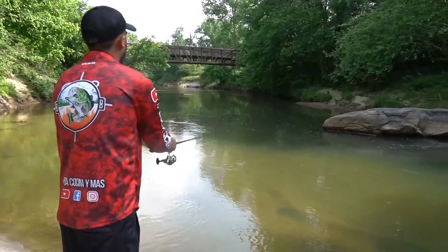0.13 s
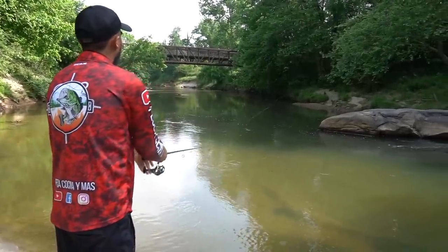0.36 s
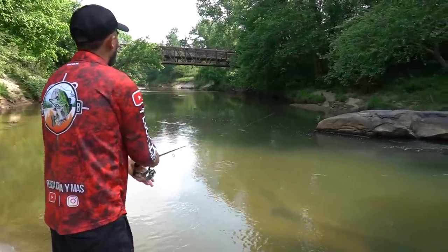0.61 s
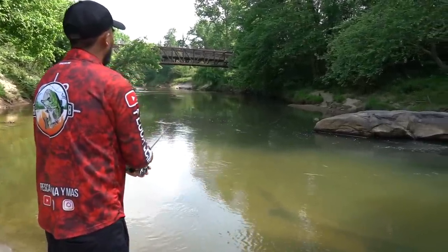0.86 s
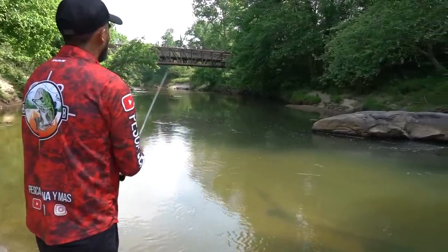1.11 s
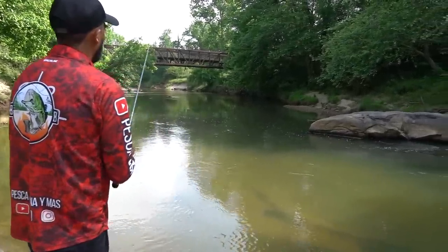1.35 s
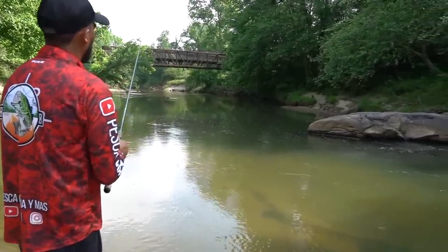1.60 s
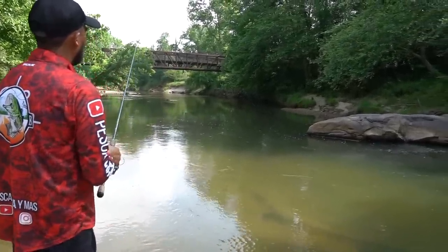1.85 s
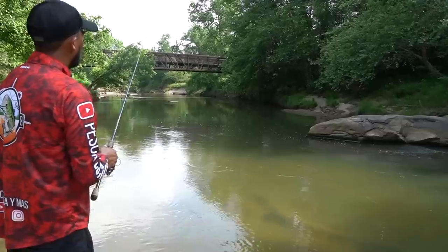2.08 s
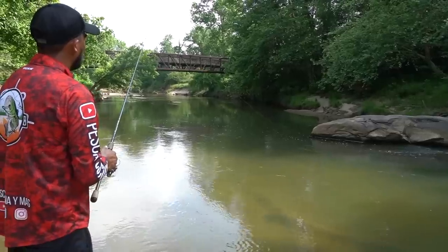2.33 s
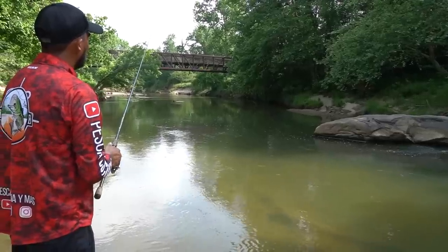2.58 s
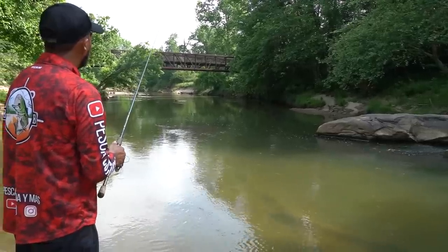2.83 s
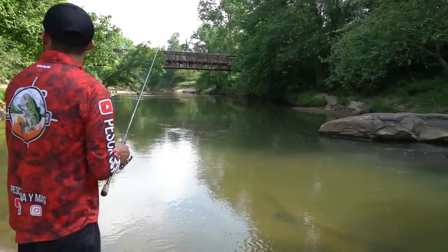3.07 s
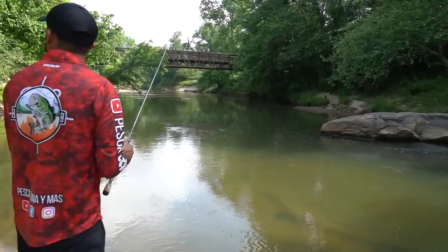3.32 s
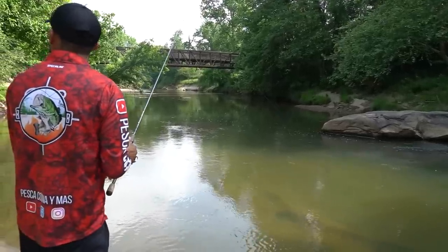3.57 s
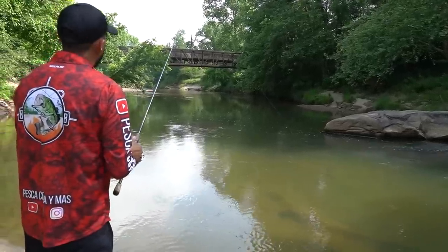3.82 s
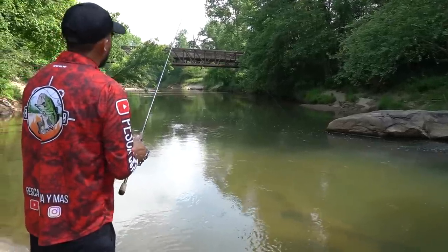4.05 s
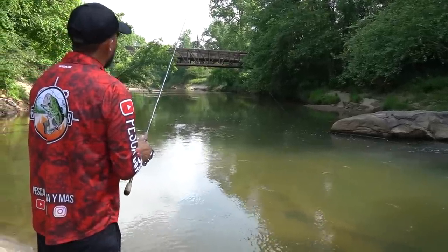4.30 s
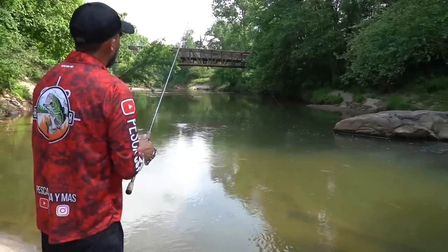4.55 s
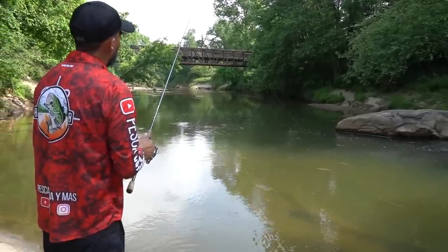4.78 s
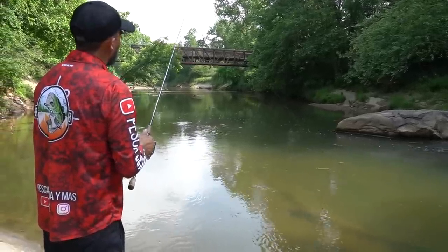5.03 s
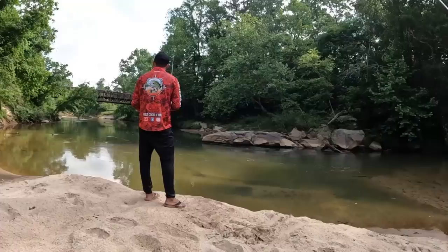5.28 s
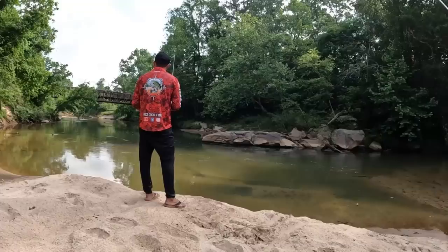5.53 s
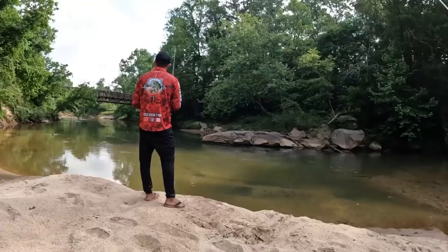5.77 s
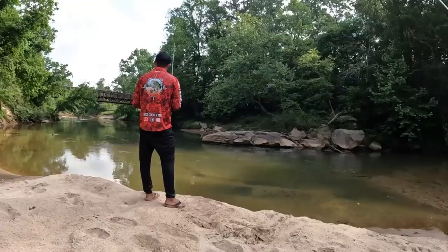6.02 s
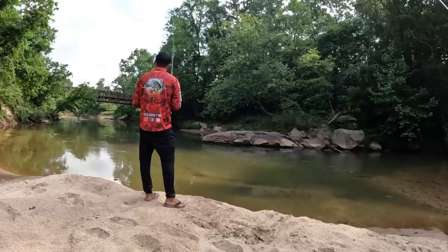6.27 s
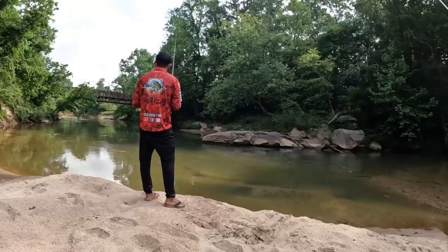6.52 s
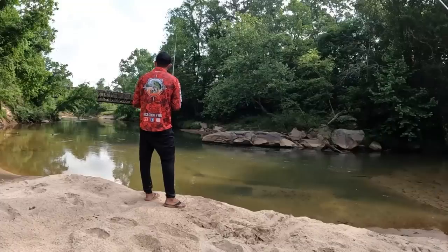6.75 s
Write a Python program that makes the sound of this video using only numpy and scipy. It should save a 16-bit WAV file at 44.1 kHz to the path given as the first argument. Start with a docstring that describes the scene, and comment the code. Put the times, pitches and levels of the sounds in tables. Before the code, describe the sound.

Wooded river bank, close body-worn microphone. Quick birds whistle with echoes from the trees over a soft low rumble. Shirt cloth rustles and a reel bail snaps sharply at about one second, followed by ticks, faint crackles and watery drips. Thin nasal bird squeals come later. Just after five seconds it cuts to a farther microphone: quieter, duller, wider, with sparse drips, light lapping and a puff of leaves.

```python
"""A wooded river bank: songbirds whistle (gliding sines), squeal (overtones under a bill resonance) and buzz,
and the trees echo them (decaying noise tails) over a low distant rumble of coloured noise.
Close to a body-worn microphone an angler's shirt rustles (modulated noise), a reel snaps and ticks (struck
modes, band-passed blows), stray snaps crackle, and water drips and gurgles (ringing bubbles).
At the cut a second, wider microphone further up the bank takes over: quieter, duller, with leaves and lapping."""
import sys
import numpy as np
from scipy import signal
from scipy.fft import rfft, irfft
from scipy.io import wavfile
from scipy.ndimage import uniform_filter1d

SR = 44100
rng = np.random.default_rng(int(sys.argv[2]) if len(sys.argv) > 2 else 0)


def wav_record(signal):
    """Record a signal, one row per channel, as 16-bit PCM in the file named by sys.argv[1]."""
    frames = np.transpose(np.atleast_2d(signal))
    bounded = np.clip(frames, -1, 1)
    # unit amplitude maps onto the largest positive 16-bit level
    quanta = np.round(bounded * 32767).astype(np.int16)
    wavfile.write(sys.argv[1], SR, quanta)


def voltage_ratio(level):
    """Linear amplitude factor for a level in decibels (scalar or array-like)."""
    return 10 ** (np.asarray(level, float) / 20)


N = 303408
TIME = np.arange(N) / SR
CUT_S = 5.165  # the far microphone takes over


def colour(points):
    """Spectral shaping: white noise weighted by a (Hz, dB) curve on a log frequency axis, scaled to rms 1."""
    hz, db = np.transpose(points)
    f = np.maximum(np.fft.rfftfreq(N, 1 / SR), 1)
    gain = voltage_ratio(np.interp(np.log(f), np.log(hz), db, -90, -90))
    x = irfft(rfft(rng.standard_normal(N)) * gain, N)
    return x / x.std()


def band(x, lo_hz, hi_hz, order=2):
    """Band limitation: a Butterworth band-pass."""
    sos = signal.butter(order, [lo_hz, min(hi_hz, SR / 2.2)], "band", fs=SR, output="sos")
    return signal.sosfilt(sos, x)


def curve(table):
    """Linear interpolation: the columns after the time column, sample by sample."""
    s, *columns = np.transpose(table)
    return [np.interp(TIME, s, c) for c in columns]


def walk(rate):
    """Slow random modulation: held random levels, smoothed, with spread 1; rate in steps per second."""
    k = int(SR / rate)
    x = uniform_filter1d(np.repeat(rng.standard_normal(N // k + 1), k), k)[:N]
    return x / x.std()


def add(out, s, x):
    """Superposition: a sound is summed in at its start in seconds."""
    i = max(int(s * SR), 0)
    out[i:i + len(x)] += x[:N - i]


def whistles():
    """Frequency modulation: soft-ended gliding sines, shaken by burr; returns direct sound and echo feed."""
    # Near-sine notes. Each row: start in seconds, length in seconds, first and last frequency in Hz,
    # level in dB, gain of the direct sound alone in dB.
    clear_notes = [(0.0, 0.026, 3050, 3030, -46, 3), (0.121, 0.044, 3045, 2990, -40.5, 2),
                   (0.191, 0.019, 2260, 2780, -42.5, 0), (0.212, 0.037, 2775, 2370, -48, 10.5),
                   (0.419, .012, 3280, 3920, -42, 2), (.435, 0.027, 3420, 2660, -38.5, 0),
                   (0.489, 0.057, 2943, 3600, -40.5, 2.5), (0.539, .09, 3580, 3344, -40, -6),
                   (0.674, .056, 2413, 2487, -42.5, 9), (0.751, 0.027, 2905, 3000, -35, 0.5),
                   (0.802, 0.16, 2980, 2900, -48, -5), (1.065, 0.087, 3320, 3030, -42.5, 9),
                   (1.133, 0.0915, 3190, 2976, -43.5, 6), (1.213, 0.061, 3060, 3010, -49, -9),
                   (1.283, 0.042, 2787, 2370, -41, 3), (1.304, 0.046, 2406, 2470, -37, -5),
                   (1.36, 0.042, 2524, 2717, -42, 4), (1.4, 0.046, 2700, 2420, -47.5, 11),
                   (1.724, 0.052, 3050, 2270, -42.5, 7), (1.902, 0.066, 3006, 3080, -38.5, 3),
                   (1.939, 0.046, 3037, 3330, -39, 3), (2.29, 0.067, 2370, 3090, -47.5, 7),
                   (2.879, 0.16, 6630, 5970, -60, 0), (3.086, 0.14, 5720, 4130, -49, -5),
                   (3.425, 0.011, 3880, 3720, -44.5, 1.5), (3.712, 0.049, 3990, 4000, -49, 1),
                   (3.947, 0.065, 4120, 4060, -47, 0), (4.039, 0.051, 4050, 3250, -51.5, 12),
                   (4.193, 0.085, 3370, 2820, -55, 3), (4.3, 0.064, 2740, 2320, -60, 10.5),
                   (4.85, 0.16, 4110, 3770, -60, 5), (5.744, 0.079, 3070, 2785, -65, 2),
                   (6.3, 0.092, 2795, 2830, -62.5, -1), (6.0702, 0.0096, 5870, 7900, -37.5, -0.5),
                   (6.137, .018, 6460, 8220, -44.5, -12)]
    # Buzzy notes of a farther bird. Each row: start in seconds, length in seconds, first and last
    # frequency in Hz, level in dB.
    buzzy_notes = [(2.236, 0.027, 3115, 2950, -38.5), (3.202, 0.13, 4490, 3795, -49),
                   (3.502, 0.0493, 3920, 3740, -47), (3.596, 0.093, 3370, 3060, -53.5),
                   (3.76, 0.091, 4800, 4120, -49), (4.052, 0.051, 4570, 4110, -49),
                   (4.25, .14, 3490, 3850, -58), (6.073, 0.12, 3245, 2920, -64),
                   (6.681, 0.12, 3250, 2990, -64)]
    burr_at_3_khz, burr_power = .02, .6  # pitch shake as a share of the pitch, growing with pitch
    buzz_burr, buzz_direct_db = .07, 3
    octave_db = -25  # faint octave overtone
    direct, sung, shake = np.zeros(N), np.zeros(N), walk(400.)
    notes = [(*row, burr_at_3_khz * (row[2] / 3000) ** burr_power) for row in clear_notes]
    notes += [(*row, buzz_direct_db, buzz_burr) for row in buzzy_notes]
    for s, length, hz0, hz1, db, direct_db, burr in notes:
        u = np.linspace(0, 1, int(length * SR))
        glide = hz0 * (hz1 / hz0) ** u
        hz = glide * (1 + burr * shake[int(s * SR):][:len(u)])
        phase = 2 * np.pi * np.cumsum(hz) / SR
        tone = np.sin(phase) + voltage_ratio(octave_db) * np.sin(2 * phase)
        note = voltage_ratio(db) * np.sin(np.pi * u) ** .5 * tone
        add(sung, s, note)
        add(direct, s, voltage_ratio(direct_db) * note)
    return direct, sung


def squeals():
    """Source and filter: the open bill favours the overtones near its resonance; each flickers a little."""
    # Nasal squeals, one list per note. Each row: time in seconds, pitch in Hz, level in dB,
    # bill resonance in Hz.
    squeal_notes = [
        [(2.71, 1500, -56, 5970), (2.76, 1353, -58, 5400), (2.854, 1304, -60, 5500), (2.9, 1240, -56, 6200)],
        [(3.34, 1588, -47, 6300), (3.374, 1376, -54, 6760), (3.41, 1330, -53, 6400), (3.5, 1335, -55, 6400),
         (3.6, 1242, -51, 6900), (3.63, 1190, -60, 5800)],
        [(3.92, 1456, -51, 8100), (3.964, 1416, -56, 8600), (4.0, 1242, -49, 7740), (4.106, 1173, -53.5, 7000),
         (4.14, 1190, -64, 6600)],
        [(4.27, 1016, -55, 6000), (4.328, 1170, -50, 6900), (4.37, 1254, -47.5, 6500)],
        [(4.49, 1104, -51, 5640), (4.54, 1148, -55.5, 6150), (4.575, 1220, -56, 7050)],
        [(4.795, 1410, -53, 7300), (4.9, 1282, -52, 7200), (4.958, 1140, -53, 6200), (4.975, 1125, -60, 6000)],
    ]
    bill_width_hz, flicker_db = 1500, 1
    out, wobble = np.zeros(N), walk(300.)
    flicker = {k: voltage_ratio(flicker_db * walk(40.)) for k in (4, 5, 6)}  # multiples of the pitch
    for note in squeal_notes:
        s, *columns = np.transpose(note)
        t = np.arange(s[0], s[-1], 1 / SR)
        at = (t * SR).astype(int)
        hz, db, bill_hz = (np.interp(t, s, c) for c in columns)
        phase = 2 * np.pi * np.cumsum(hz * (1 + 0.01 * wobble[at])) / SR
        tone = np.zeros(len(t))
        for k, gain in flicker.items():
            resonance = np.exp(-((k * hz - bill_hz) / bill_width_hz) ** 2)
            tone += gain[at] * resonance * np.sin(k * phase)
        add(out, s[0], np.sqrt(2) * voltage_ratio(db) * tone * signal.windows.tukey(len(t), .1))
    return out


def trees(x, t60, wet_db, gap_s):
    """Diffuse reverberation: trunks and banks scatter echoes that build up and decay, one set for each side."""
    t = np.arange(int(1.5 * SR)) / SR
    decay = np.exp(-np.log(1000) * t / t60)
    tail = rng.standard_normal((2, len(t))) * decay * (1 - np.exp(-t / gap_s))
    tail *= voltage_ratio(wet_db) / np.sqrt((tail ** 2).sum(1, keepdims=True))
    return signal.fftconvolve(x[None], tail, axes=1)[:, :N]


def reel():
    """Modal vibration: the bail snaps shut and rings in its modes; small parts tick broad and short."""
    # Blows and bounces of the bail. Each row: start in seconds, level in dB.
    snap_blows = [(1.029, -29.5), (1.0453, -3.5), (1.0493, -16.5), (1.0575, -24), (1.065, -21)]
    # Modes of the bail. Each row: frequency in Hz, relative level in dB, 60 dB decay time in seconds.
    bail_modes = [(2830, -24.5, 0.0062), (4800, -4.5, 0.013), (5500, 1.5, 0.0029), (7460, -5.5, 0.0078),
                  (9000, -23, 0.0033), (10620, -2.5, 0.0068), (15430, -14, .006)]
    # Reel and line ticks. Each row: start in seconds, level in dB, brightness in dB (fizz up, knock down).
    tick_blows = [(.0148, -18, 8), (0.2285, -20, 14), (.389, -33, 11), (0.5316, -17.5, -1),
                  (0.659, -21, -2), (.6724, -17.5, 9), (.7262, -21, -8), (.794, -17.5, 7), (1.008, -14, -4),
                  (1.1014, -28, 2), (1.1128, -10, 3), (1.122, -16, 6), (1.1293, -17.5, 6), (1.202, -16, 5),
                  (1.334, -21, -10), (1.571, -22, 6), (1.6276, -22, 8), (1.9728, -19, 13),
                  (2.0024, -17, 11), (2.0821, -16.5, -7), (2.268, -27, -4), (2.4155, -23, 5),
                  (2.5243, -20.5, 11), (2.656, -24, 11), (2.682, -22, 8), (2.9043, -24, -2),
                  (3.305, -21, 9), (3.322, -19, 9), (3.71, -21.5, 15.5), (3.741, -24, 8), (3.8865, -17, 8),
                  (3.9112, -22, 10), (3.931, -18, 9), (4.3595, -32, 4), (4.3988, -21, 8), (4.4518, -32, 20),
                  (4.528, -25, 14), (4.571, -17.5, 17), (4.791, -26, 10), (5.2185, -34, 0.5),
                  (5.34, -40.5, -3), (5.467, -35, 12), (5.5527, -38.5, 3)]
    knock_db, fizz_db = 8, -16.5  # at brightness 0
    knock_per_db = .85  # knock lost per dB of brightness
    out, t = np.zeros(N), np.arange(SR // 20) / SR
    ring = np.zeros(len(t))
    for hz, db, t60 in bail_modes:
        ring += voltage_ratio(db) * np.exp(-np.log(1000) * t / t60) * np.sin(2 * np.pi * hz * t)
    crack = rng.standard_normal(len(t)) * np.exp(-t / 0.00071)  # the crack of contact
    ring += voltage_ratio(-1.5) * band(crack, 2100.0, 14000.0)
    for s, db in snap_blows:
        add(out, s, voltage_ratio(db) * ring * (1 - np.exp(-t / .0003)))
    for s, db, bright_db in tick_blows:
        chatter = rng.standard_normal(len(t)) * np.exp(-t / .002)
        blow = (t == 0) + 0.16 * chatter  # one contact and a short chatter
        knock = voltage_ratio(knock_db - knock_per_db * bright_db) * band(blow, 1200.0, 4500.0)
        middle = band(blow, 3200.0, 6900.0)
        fizz = voltage_ratio(fizz_db + bright_db) * band(blow, 7400.0, 15000.)
        add(out, s, voltage_ratio(db) * (knock - middle + fizz))
    return out


def rustle():
    """Stick-slip friction: fine hiss that follows the stirring, and short bursts of unevenly grained noise."""
    # How much shirt and arms stir. Each row: time in seconds, level over rest in dB before weighting by band.
    stirring = [(0, 3.5), (.6, 1), (.8, 8), (.95, 17.5), (1.12, 13.5), (1.25, 14.5), (1.4, 7.5),
                (1.55, 1.5), (1.7, 8.5), (1.9, 8.5), (2.15, 10.5), (2.4, 3.5), (3, 0.5), (3.8, 2.5),
                (4.6, -0.5), (5.17, -3.5)]
    # Spectra of the rustle. Each row: frequency in Hz, relative density in dB per Hz.
    treble_spectrum = [(1180, -27), (2000, -16.5), (3180, -2), (3790, -5), (5100, -10.5), (6330, -5.5),
                       (10000, -9.5), (13000, -47), (22000, -120)]
    top_spectrum = [(7000, -28.5), (10000, -5), (15300, -7.5), (15900, -25.5)]
    body_spectrum = [(260, -46.5), (450, -6), (1150, -4.5), (1430, -3), (2310, -1.5), (3020, -2.5),
                     (4430, -4.5), (8000, -20.5), (10400, -41), (17600, -120)]
    # Short bursts of band noise: rubs, and a few tick-like bursts of a few milliseconds.
    # Each row: middle in seconds, half-length in seconds, level in dB, lowest and highest frequency in Hz.
    noise_bursts = [(0.229, .015, -46.5, 3500, 10100), (0.524, 0.022, -37.5, 3850, 4760),
                    (.663, .003, -39, 1500, 12000), (.795, 0.0045, -59, 1510, 11900),
                    (0.861, 0.013, -51, 1980, 9000), (.903, 0.016, -25, 1460, 9000),
                    (1.003, 0.022, -28.5, 2010, 7500), (1.049, 0.015, -30.5, 2500, 9000),
                    (1.282, 0.018, -39, 3000, 12800), (1.328, 0.033, -38, 1180, 5940),
                    (1.648, 0.024, -45, 1000, 5000), (1.972, 0.051, -49.5, 4070, 10000),
                    (2.082, 0.00085, -37, 1510, 4460), (1.15, 0.22, -52.5, 450, 890),
                    (2.08, 0.029, -38, 1450, 7500), (2.278, 0.024, -42, 2510, 4800),
                    (2.34, 0.017, -44, 2530, 5700), (5.345, 0.0077, -53.5, 3970, 8500)]
    stir_db, = curve(stirring)
    # level at rest in dB, and the share of the stirring that each band takes
    treble = voltage_ratio(-56.5 + 0.67 * stir_db)
    top = voltage_ratio(-62.5 + 0.51 * stir_db)
    body = voltage_ratio(-55.5 + 1.083 * stir_db)
    # a thin line hiss dies away from the start
    line_treble = voltage_ratio(-49) * np.exp(-TIME / 0.84)
    line_top = voltage_ratio(-46.5) * np.exp(-TIME / .55)
    hiss = np.hypot(treble, line_treble) * colour(treble_spectrum)
    hiss += np.hypot(top, line_top) * colour(top_spectrum)
    hiss += body * colour(body_spectrum)
    out = voltage_ratio(walk(250.)) * hiss * (TIME < CUT_S)
    grains = rng.standard_normal(N) * voltage_ratio(3.1 * walk(1500.))
    for s, half, db, lo_hz, hi_hz in noise_bursts:
        t = np.arange(-3 * half, 3 * half, 1 / SR)
        i = int((s + t[0]) * SR)
        # steep below, gentle above
        burst = band(grains[i:i + len(t)], lo_hz, hi_hz, order=1)
        burst = band(burst, lo_hz, 9400.0)
        out[i:i + len(t)] += voltage_ratio(db) * burst / burst.std() * np.exp(-(t / half) ** 2 / 2)
    return out


def bubble(hz, cycles, glide):
    """Bubble resonance: a ringing air pocket whose pitch rises as it nears the surface."""
    u = np.arange(int(3 * cycles / hz * SR)) * hz / cycles / SR  # 1 after the given cycles
    phase = 2 * np.pi * np.cumsum(hz * 2 ** (glide * (u - .3))) / SR
    return np.exp(-1.6 * u) * (1 - np.exp(-u * 25)) * np.sin(phase)


def drips():
    """Impact and bubble resonance: each clear drop lands with a short splat while its bubble rings."""
    # The clearest bubbles and drips. Each row: start in seconds, level in dB, pitch in Hz,
    # upward glide in octaves per ring.
    clear_drops = [(.029, -33.5, 842, 0.16), (.5, -44, 720, 0.28), (0.703, -27, 1146, 0.072),
                   (.789, -41, 680, .15), (1.0084, -23.5, 2550, 0.087), (1.101, -25.5, 1385, 0.44),
                   (1.185, -42, 1370, .23), (1.628, -39, 1570, .25), (2.485, -37, 2880, .15),
                   (2.63, -35, 1590, 0.61), (2.743, -39, 1014, .25), (2.75, -40, 1950, .2),
                   (2.846, -39, 1900, 0.47), (3.28, -42, 2400, .15), (3.306, -42, 1860, .25),
                   (3.321, -38.5, 1470, 0.29), (3.3533, -38, 2250, .18), (3.403, -36, 2570, 0.32),
                   (3.457, -42, 1120, .2), (3.766, -34, 1450, 0.11), (3.7662, -38, 2300, .15),
                   (3.8072, -41, 2360, .19), (3.823, -39, 730, .16), (3.869, -29.5, 1090, 0.32),
                   (3.955, -39.5, 1280, 0.29), (4.013, -30, 1530, 0.16), (4.1225, -42, 2700, .13),
                   (4.426, -44, 1730, 0.18), (4.5468, -37, 2750, 0.17), (4.6034, -39, 3760, .15),
                   (4.915, -38, 1550, .15), (4.965, -40, 1790, 0.32), (4.9721, -43, 2780, .14),
                   (5.0496, -44, 2600, .17), (5.0728, -29.5, 3860, .09), (5.1012, -37, 3700, .13),
                   (5.377, -40, 1460, 0.23), (5.389, -43.5, 1770, .25), (5.47, -43, 1690, .38),
                   (5.491, -40, 1850, .25), (5.509, -45.5, 3150, .15), (5.548, -42.5, 1480, .3),
                   (5.5852, -49, 2350, .15), (6.145, -38, 1360, 0.1), (6.182, -43, 1670, .25),
                   (6.245, -40, 1280, 0.6), (6.404, -45, 1820, .29), (6.469, -48, 1394, .32)]
    cycles_at_1_khz = 11.  # small bubbles ring for more cycles
    splat_db, splat_s = -10, 0.0013
    out, t = np.zeros(N), np.arange(SR // 100) / SR
    for s, db, hz, glide in clear_drops:
        cycles = cycles_at_1_khz * (hz / 1000) ** 0.39
        add(out, s, voltage_ratio(db) * bubble(hz, cycles, glide))
        splat = band(rng.standard_normal(len(t)) * np.exp(-t / splat_s), .6 * hz, 2.5 * hz)
        add(out, s, voltage_ratio(db + splat_db) * np.sqrt(SR / hz / 4) * splat)
    return out


def gurgle(level_db, top_octaves, spread_db, count):
    """Random superposition: many small bubbles, uneven in size, ring and glide."""
    out = np.zeros(N)
    for when, pitch, size, ring, rise in rng.random((count, 5)):
        pocket = bubble(850 * 2 ** (top_octaves * pitch), 4 + 12 * ring, 0.46 * rise)
        add(out, when * TIME[-1], voltage_ratio(spread_db * size ** 3) * pocket)
    return voltage_ratio(level_db) * out


def crackle(count=340):
    """Damped oscillation: stray faint snaps of fibres and line, each at its own pitch; fainter after the cut."""
    out, t = np.zeros(N), np.arange(SR // 200) / SR
    envelope = np.exp(-t / 0.00066) * (1 - np.exp(-t / .0001))
    for when, pitch, size in rng.random((count, 3)):
        snap = envelope * np.sin(2 * np.pi * 3000 * 2 ** (1.8 * pitch) * t)
        add(out, when * TIME[-1], voltage_ratio(-46.5 + 15 * size ** 2) * snap)
    return out * voltage_ratio(-22 * (TIME > CUT_S))


def air(points):
    """Amplitude modulation of coloured noise: a distant rumble whose upper part swells on its own."""
    # Swells. Each row: time in seconds, gain of the whole in dB, further gain of the upper part in dB.
    swells = [(0, -6, 2), (1.3, -4, -1.5), (2.35, -4, 2.5), (2.55, -4, 8.5), (2.75, -3, 1.5),
              (3.4, -2.5, 1), (4.0, -4.5, 5), (4.65, 1, -2.5), (5.1, 0, -2), (5.25, -4.5, -8),
              (5.55, -3.5, -9.5), (6.04, -5.5, -11.5), (6.4, -9, -3), (6.88, -9, -9.5)]
    level_db, upper_db = curve(swells)
    x = colour(points)
    low = signal.sosfiltfilt(signal.butter(2, 200., fs=SR, output="sos"), x)
    return voltage_ratio(level_db) * (low + voltage_ratio(upper_db) * (x - low))


def far_bank():
    """Partial coherence: rumble, lapping water and leaves, partly unlike left and right."""
    # Spectrum of the far rumble. Each row: frequency in Hz, relative density in dB per Hz.
    far_spectrum = [(8.8, -46), (15, -5), (70, -1.5), (176, -4.5), (311, -10), (392, -9.5), (439, -10.5),
                    (756, -24.5), (1160, -34.5), (2240, -37), (2990, -28.5), (5140, -44), (7050, -35),
                    (12100, -61), (14000, -81)]
    # Spectral tilt of the side signal. Each row: frequency in Hz, relative side minus mid in dB.
    side_tilt = [(60, -19.5), (110, -37), (200, -16), (380, -20), (700, -14), (1290, -26), (2380, -11),
                 (4400, -12), (8120, -20), (15000, 4)]
    # Lapping water. Each row: time in seconds, gain in dB.
    lapping = [(5.165, -69), (5.483, -63), (5.609, -69.5), (5.899, -68), (6.005, -70), (6.2, -63.5),
               (6.497, -60), (6.683, -67), (6.88, -66.5)]
    # Gusts in the leaves. Each row: peak in seconds, rise in seconds, fall in seconds, gain in dB.
    leaf_gusts = [(5.451, 0.11, 0.071, -69.5), (6.24, 0.038, .11, -54.5)]
    hz, db = np.transpose(far_spectrum)
    tilt_hz, tilt_db = np.transpose(side_tilt)
    wide = db + np.interp(np.log(hz), np.log(tilt_hz), tilt_db)
    mid = voltage_ratio(-36.5) * air(far_spectrum)
    side = voltage_ratio(-63.0) * colour(np.transpose([hz, wide]))

    lap_db, = curve(lapping)
    patter = gurgle(lap_db, 1.7, 15.1, count=3600)
    lap = patter + trees(patter, 0.17, -6.0, 0.0024)

    leaf_gain = voltage_ratio(-85)  # between gusts
    for s, rise, fall, gust_db in leaf_gusts:
        distance = np.where(TIME < s, (s - TIME) / rise, (TIME - s) / fall)
        leaf_gain = leaf_gain + voltage_ratio(gust_db) * np.exp(-distance)
    noise = rng.standard_normal((3, N))  # left, right and shared
    leaves = leaf_gain * band(noise[:2] * 0.58 + noise[2], 5500.0, 10850.0, order=4)
    return np.array([[.95], [1.05]]) * mid + np.array([[1], [-1]]) * side + lap + leaves


def scene():
    """Superposition at two microphones, crossfaded at the cut; the far one takes echoes only of later sounds."""
    # Spectra before the cut: rumble, and a faint side-only noise (opposite sign left and right).
    # Each row: frequency in Hz, relative density in dB per Hz.
    near_spectrum = [(12, -41), (20, -2.5), (33, -13.5), (90, 5.5), (192, 2.5), (334, 0.5), (726, -18.5),
                     (2010, -40.5), (3200, -55.5), (3740, -20), (4000, -22.5), (5200, -51), (8800, -120)]
    side_spectrum = [(400, -10), (700, -3.5), (1300, -28), (3000, -24), (8000, -21), (12000, -14),
                     (15700, -9.5)]
    song, sung = whistles()
    squeal = squeals()
    before = TIME < CUT_S
    wet = drips() + gurgle(-61.0, 1.6, 18.1, count=1300) * before
    direct = song + squeal + wet + reel() + rustle() + crackle()
    sides = np.array([[1], [-1]])

    near_echo = trees(sung, 0.99, 4, 0.0042)
    near_echo += trees(squeal, 0.51, -1.8, 0.0077)
    near_echo += trees(wet, 0.073, -1.4, 0.0043)
    near = direct + near_echo[0] + voltage_ratio(-38.5) * air(near_spectrum)
    near = near + voltage_ratio(-72.0) * sides * colour(side_spectrum)

    far_echo = trees(sung * ~before, 1.04, 4.6, 0.002) + trees(wet * ~before, 0.3, -4, 0.0027)
    far = direct * ~before + far_echo[0] + voltage_ratio(-8) * sides * far_echo[1] + far_bank()
    # this microphone stops lower
    far = signal.sosfilt(signal.ellip(8, .3, 60, 13200., fs=SR, output="sos"), far)
    fade = np.clip((TIME - CUT_S) / 0.0071 + 1, 0, 1)
    return (1 - fade) * near + fade * far


def roll_off(x):
    """The treble ends steeply here."""
    return signal.sosfilt(signal.butter(12, 17490, fs=SR, output="sos"), x)


def record(dry):
    """Band limitation: the recorder cuts the top with a steep elliptic low-pass."""
    cut = signal.sosfilt(signal.ellip(8, .2, 60, 15900, fs=SR, output="sos"), dry)
    return roll_off(cut)


dry = scene()
out = record(dry)
wav_record(out)
```